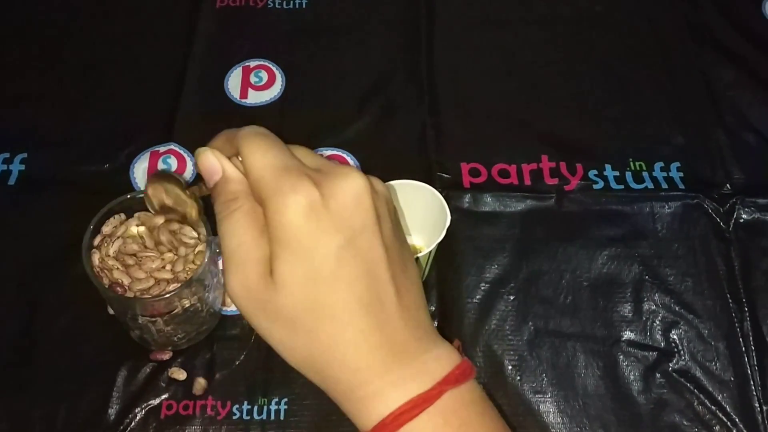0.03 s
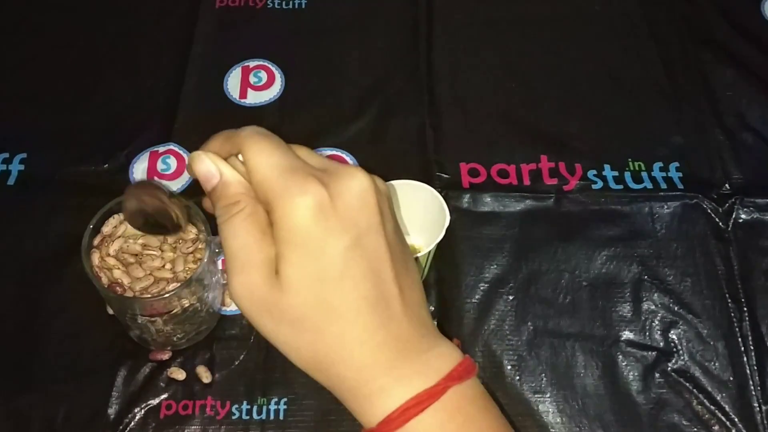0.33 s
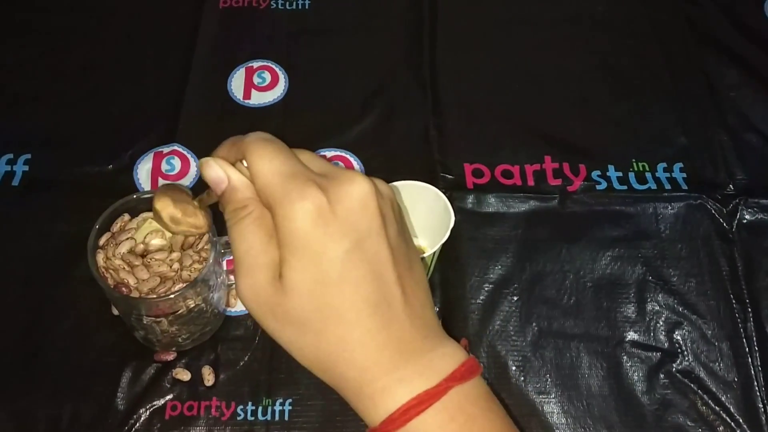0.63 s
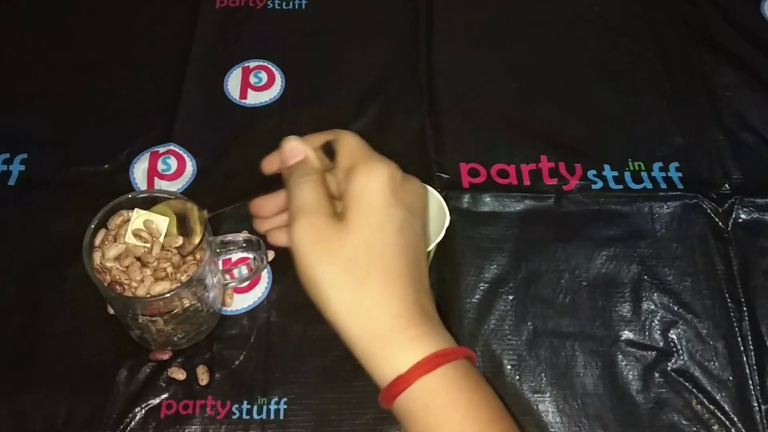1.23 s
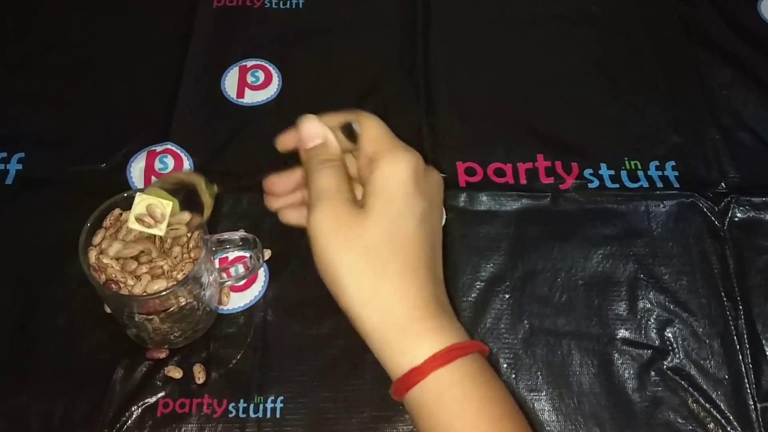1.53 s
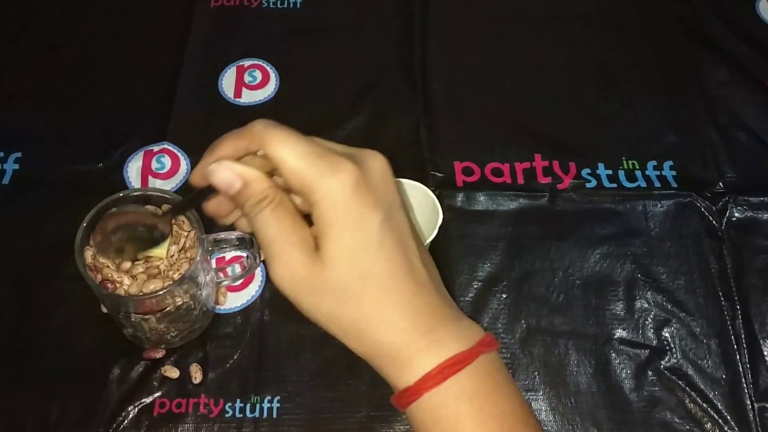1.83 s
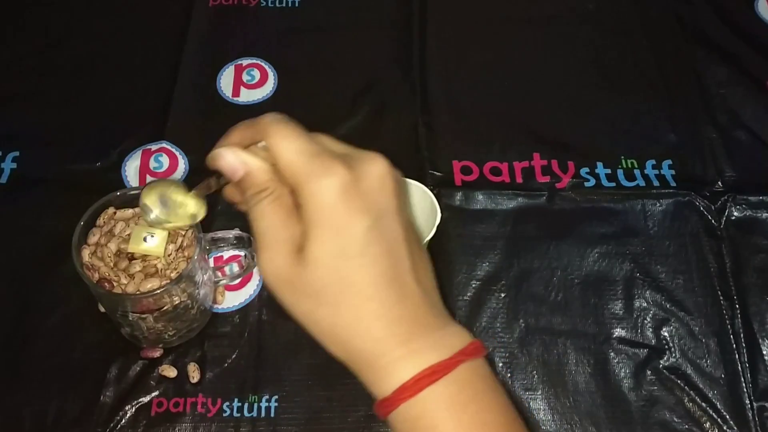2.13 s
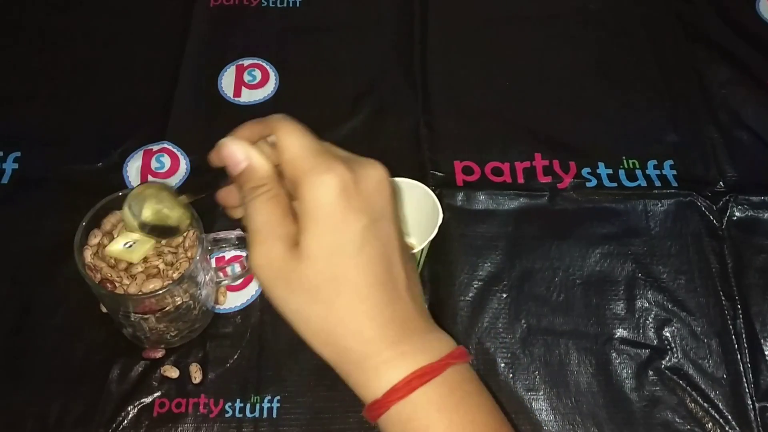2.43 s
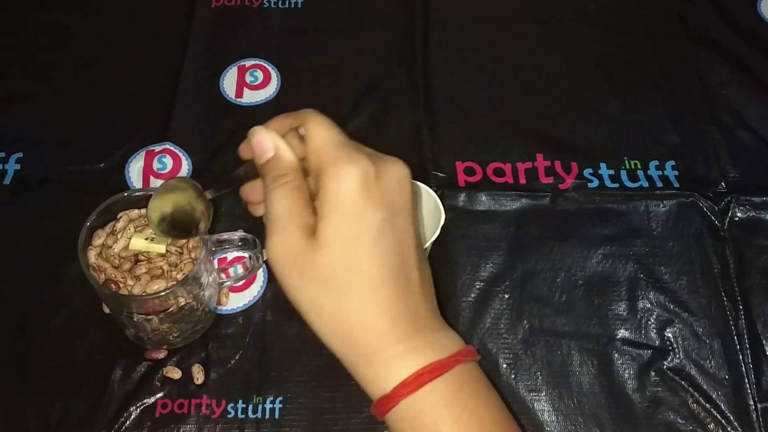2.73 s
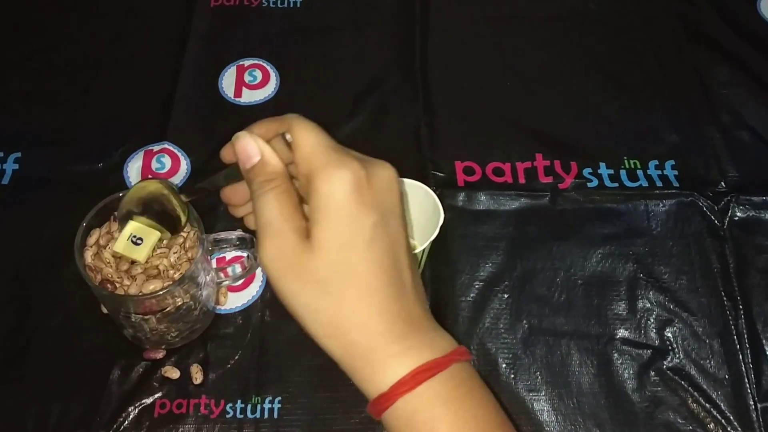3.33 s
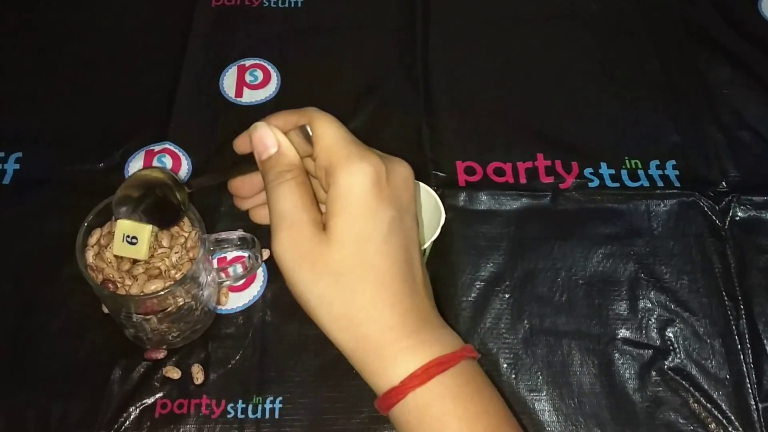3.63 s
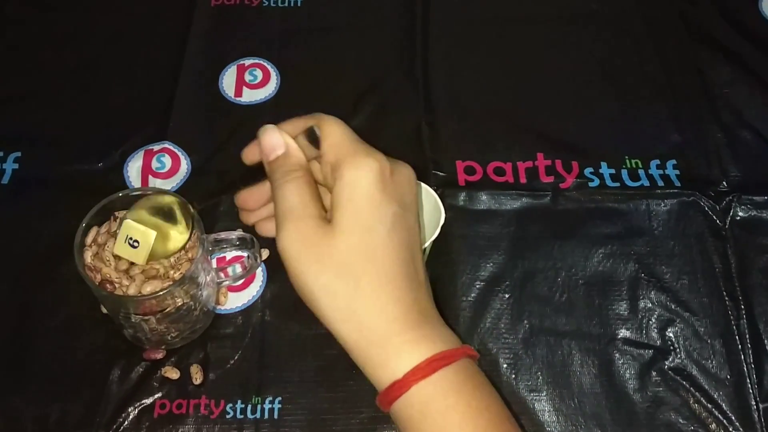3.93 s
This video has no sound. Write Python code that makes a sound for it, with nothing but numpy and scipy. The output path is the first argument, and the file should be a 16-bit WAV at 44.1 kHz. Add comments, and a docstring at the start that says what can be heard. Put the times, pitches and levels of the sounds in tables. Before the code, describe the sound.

A metal spoon digs through dry beans in a glass, close by in a small room. The beans rustle and tick, dull table knocks come early, then short clinks follow in clusters over a steady motor hum.

```python
"""A metal spoon digs in a glass of dry beans, close by, in a small hard-walled room.
From the outset a motor hums over dark noise, and the beans rustle and tick as the spoon scrapes through.
In the first half second hand and glass knock dully on the table, and the spoon first clinks on the glass,
its ring quickly damped by beans and fingers. The clinks then come in clusters, loudest near 1.8 and 2.5 s;
from 1.5 s the spoon's bowl also clacks hollowly on the beans, and one last knock falls at 2.9 s."""
import sys
import numpy as np
from scipy import signal
from scipy.fft import rfft, irfft
from scipy.io import wavfile
from scipy.ndimage import uniform_filter1d, minimum_filter1d

SR = 44100
rng = np.random.default_rng(int(sys.argv[2]) if len(sys.argv) > 2 else 0)


def unload_wav(signal):
    """Save mono or channel-first audio to the path in sys.argv[1] as 16-bit WAV at rate SR, clipped to [-1, 1]."""
    wavfile.write(
        sys.argv[1],
        SR,
        np.round(np.clip(np.atleast_2d(signal).T, -1, 1) * 32767).astype(np.int16),
    )


N = 176400
T = np.arange(N) / SR

# Faint tones beside the motor's main one: (frequency [Hz], level [dB])
MOTOR_PARTIALS = [(357, -66.5), (1077, -68)]
# Spectrum of the background noise: (frequency [Hz], relative density [dB])
NOISE_SPECTRUM = [(25, -105), (90, -101), (150, -81.5), (230, -80), (380, -80), (560, -85.5), (800, -88.5),
                  (1400, -96.5), (2300, -98.5), (3500, -102), (8000, -102), (15500, -102)]
# Likeness of that noise in left and right: (frequency [Hz], coherence [0-1])
NOISE_COHERENCE = [(60, 1), (180, 0.8), (550, 0.53), (1650, 0), (5000, 0)]
# Soft low swells in the noise: (time [s], frequency [Hz], level [dB])
NOISE_SWELLS = [(.37, 440, -51), (.7, 370, -54.5), (1.48, 523, -57.5), (1.53, 427, -52.5), (2.03, 390, -51),
                (3.28, 364, -50)]
# Push of the spoon, as the envelope of the rustle: (time [s], level [dB])
PUSH_ENVELOPE = [(0, -43), (.06, -40.5), (.15, -50.5), (.21, -45.5), (.36, -42), (.46, -61), (.58, -69),
                 (.6, -49), (.67, -62), (.72, -46), (.87, -59.5), (1.08, -46), (1.17, -52.5), (1.27, -39.5),
                 (1.31, -52.5), (1.6, -54.5), (1.75, -49.5), (1.9, -51.5), (1.99, -43), (2.06, -67),
                 (2.37, -78), (2.39, -47), (2.52, -57.5), (2.58, -41.5), (2.66, -56.5), (2.87, -63),
                 (2.95, -50), (3.14, -67), (3.29, -41.5), (3.35, -61), (3.54, -50), (3.6, -67),
                 (3.72, -49.5), (3.8, -68)]
# Single beans snapping past the spoon or dropping, and one faint dull touch of the spoon at 3.16 s: (time [s],
# body level [dB], click level [dB])
BEAN_TICKS = [(.0032,-56,-34.5),(0.0241,-47,-29.5),(0.2728,-43.5,-35),(0.353,-44,-32.5),(0.6421,-58,-41),(0.662,-52,-43),(0.701,-52,-33.5),(0.7122,-63,-29.5),(0.732,-51,-34.5),(0.7601,-51,-33),(.829,-52.5,-46),(0.8937,-44.5,-45),(0.9587,-50,-37.5),(0.979,-61,-44),(1.0102,-50,-38),(1.2084,-54,-38),(1.2324,-55,-34),(1.2627,-52,-29),(1.2713,-51,-36),(1.6259,-50,-42.5),(1.662,-50.5,-40),(1.716,-52,-30),(1.7237,-60,-38.5),(1.7742,-51,-39),(1.7948,-50,-38),(2.0037,-48,-34.5),(2.3939,-45,-32),(3.1581,-55,-41),(3.705,-55,-43.5)]
# Low resonances of beans on spoon and glass: (frequency [Hz], bandwidth [Hz], relative level [dB])
BEAN_BODY_MODES = [(1200, 1540, -3.5), (2340, 370, 2.5), (3340, 1300, 2), (4300, 2200, -2)]
# High resonances of the same contacts: (frequency [Hz], bandwidth [Hz], relative level [dB])
BEAN_CLICK_MODES = [(4610, 1200, -1), (5750, 190, -5.5), (7450, 880, -5.5), (8260, 490, 7.5),
                    (10300, 1300, 4), (10740, 430, 6), (12420, 250, 5.5), (13200, 1500, -5)]
# Sliding strokes of the spoon: (centre time [s], level [dB])
SCRAPE_STROKES = [(.04, -47.5), (.29, -54), (1.25, -53.5)]
# Resonances excited by sliding: (frequency [Hz], bandwidth [Hz], relative level [dB])
SCRAPE_MODES = [(2930, 950, -6.5), (4770, 420, 1), (6370, 810, 0.5)]
# Knocks of hand and glass on the table: (time [s], level [dB])
TABLE_KNOCKS = [(0.0527, -27.5), (.166, -38.5), (0.2323, -41.5), (.414, -45), (.4763, -44), (2.898, -41.5)]
# Resonances of a knock: (frequency [Hz], bandwidth [Hz], relative level [dB])
KNOCK_MODES = [(294, 350, -6), (690, 820, -4.5), (1144, 320, -7.5), (2500, 200, -13)]
# Spoon on glass: (time [s], main frequency [Hz], level of each of five mode groups, low to high [dB])
SPOON_CLINKS = [(0.184, 7990, -37, -26, -36.0, -33.5, -34), (0.739, 8690, -44, -25.5, -30.5, -37.0, -53.0),
                (0.7866, 8000, -42.5, -33, -55, -51.5, -64.5), (0.92, 8100, -48, -42, -33.5, -57, -56.5),
                (1.001, 8220.0, -41, -33.5, -40.5, -52.5, -55.5),
                (1.0608, 8280.0, -48, -22, -38, -34.0, -41), (1.0644, 8330, -41.5, -28, -31, -45.0, -71.5),
                (1.08, 8280, -47, -28, -28.5, -36, -53.5), (1.0851, 8000, -53, -30, -44, -43, -44.0),
                (1.3476, 8060, -43.5, -28, -42, -44, -43), (1.381, 7920, -34.5, -18, -41, -27.5, -20.5),
                (1.3966, 7820, -43, -22.5, -35, -27, -42), (1.4893, 8160, -35.5, -35.5, -44, -51, -70.0),
                (1.8026, 8040, -41.5, -35, -26, -27.5, -27), (1.8205, 8000.0, -28, -12.5, -31, -13.5, -23),
                (1.8329, 8040, -39, -21, -30, -26, -29), (1.8497, 8060, -45.0, -21.5, -43.0, -33.0, -38.0),
                (1.9257, 8100, -37, -25, -30, -22, -32.5), (1.942, 7830, -42, -26, -33, -31.0, -42.5),
                (1.9703, 7980.0, -33, -37, -38, -35, -40.5), (1.975, 7990, -32.5, -15, -30.0, -25, -31),
                (2.3803, 7890, -37, -34.5, -51, -41.5, -59.5),
                (2.5413, 8000, -36, -24, -20.5, -11.5, -39.0),
                (2.5519, 7980, -30.5, -18.5, -32, -17, -38.0), (2.6906, 7700, -47.5, -47, -37, -50, -54),
                (2.7582, 8040, -50, -47, -46, -40, -50), (2.817, 7930, -49, -31.5, -61, -38, -41),
                (2.898, 8200, -40, -48, -32, -34, -28.0), (2.9026, 8470.0, -36, -45, -26.5, -46.5, -39.5),
                (2.9629, 7940, -38.0, -32.5, -48, -45, -59.5),
                (3.2675, 8160.0, -35.5, -27.5, -21.5, -26, -33), (3.276, 8050, -36.5, -39.0, -39, -42, -33),
                (3.3534, 7900, -42.5, -30.0, -43, -26.5, -38.5), (3.3658, 7810, -44, -23, -48, -36, -36.5),
                (3.5073, 8650, -48, -45, -30, -49, -57), (3.5294, 8000.0, -49, -35.5, -54, -47, -64.0),
                (3.6311, 8030, -49, -32.5, -52, -51, -61.5)]
# Modes of spoon and glass, in five groups: (frequency [Hz], relative level [dB], 60 dB decay time [s])
CLINK_MODE_GROUPS = [
    [(4730, 12, 0.008), (5920, 11, 0.017), (7080, 18, 0.0042)],
    [(8140, -4.5, 0.018), (8000, -4, 0.017)],
    [(9860, 10, 0.014), (10310, 15.5, 0.015), (11750, 4.5, 0.01)],
    [(12170, 2, 0.014), (12530, 1.5, 0.003)],
    [(15540, 0, 0.029)],
]
# Shift of the modes by grip and beans from clink to clink, per group: (frequency spread [fraction])
GROUP_PITCH_SPREAD = [0.044, 0.00052, 0.031, 0, 0.0012]
# Fixed stereo balance, per group: (left minus right [dB])
GROUP_BALANCE_DB = [18.5, -17, -14, -1.5, 7]
# Feed to the room, per group: (gain [dB])
GROUP_FEED_DB = [-2, -8, -8.5, -8, -6.5]
# Clacks of the spoon's bowl: (time [s], level [dB])
BOWL_CLACKS = [(1.4893, -31.5), (2.3809, -35), (2.896, -28.5), (2.9015, -33), (3.2291, -35)]
# Resonances of a clack: (frequency [Hz], bandwidth [Hz], relative level [dB])
CLACK_MODES = [(2200, 330, -1), (2590, 410, -1), (5400, 1700, -5)]
# Reverberation of the room: (frequency [Hz], 60 dB decay time [s])
ROOM_DECAY = [(300, 0.26), (2500, 0.22), (8000, 0.29), (15000, 0.19)]

CONTACT_S, CONTACT_RISE_S, RING_S = 0.0006, 0.00016, 0.06
CLICK_PAN_DB, BODY_PAN_DB = -9, -6.5   # left minus right
HUM_LAG_S, BEAN_LAG_S, SPOON_LAG_S = 0.00028, 0.00013, 0.00015   # left behind right
BEAN_ROOM_DB = -4.5
MAIN_GROUP = 1   # the mode group tuned to each clink's main frequency


def from_db(db):
    """Amplitude ratio: tenfold for every 20 dB."""
    return 10 ** (np.asarray(db) / 20)


def unit_rms(x):
    """Normalisation to unit mean power."""
    return x / np.sqrt(np.mean(x ** 2) + 1e-30)


def at_hz(table, hz):
    """Interpolation on a logarithmic frequency axis."""
    freqs, values = np.transpose(table)
    return np.interp(np.log(np.maximum(hz, 1)), np.log(freqs), values)


def drift(rate_hz):
    """Random modulation of unit rms, linear between knots."""
    knots = rng.standard_normal(4000)
    return unit_rms(np.interp(T * rate_hz, np.arange(len(knots)), knots))


def band_limit(x, kind, hz, order=2):
    """Maximally flat filtering: low-, high- or band-pass."""
    return signal.sosfilt(signal.butter(order, hz, kind, fs=SR, output="sos"), x)


def resonate(x, hz, width_hz):
    """Damped resonance, passing about the same white-noise power at any bandwidth."""
    radius = np.exp(-np.pi * width_hz / SR)
    feedback = [1, -2 * radius * np.cos(2 * np.pi * hz / SR), radius ** 2]
    return signal.lfilter(np.sqrt(1 - radius ** 2) * np.array([1, 0, -1]), feedback, x + 1e-18)


def contact(decay_s):
    """Contact force of rough, hard surfaces: noise that builds up and decays exponentially."""
    t = np.arange(int(RING_S * SR)) / SR
    return rng.standard_normal(len(t)) * (1 - np.exp(-t / CONTACT_RISE_S)) * np.exp(-t / decay_s)


def impact(modes, decay_s=CONTACT_S, spread_db=4):
    """Modal superposition: one touch excites each resonance with a random strength."""
    return sum(from_db(db + spread_db * rng.standard_normal())
               * unit_rms(resonate(contact(decay_s), hz, width)) for hz, width, db in modes)


def add(track, time_s, db, sound):
    """Superposition of an event on a track, at the rms level given for its first 5 ms."""
    start = max(int(time_s * SR), 0)
    onset_rms = np.sqrt(np.mean(sound[:int(0.005 * SR)] ** 2))
    track[start:start + len(sound)] += (from_db(db) / onset_rms * sound)[:N - start]


def place(x, pan_db, lag_s):
    """Localisation by level and arrival time: the left channel receives the direct sound later."""
    delay = np.exp(-2j * np.pi * np.fft.rfftfreq(2 * N, 1 / SR) * lag_s)
    left = irfft(rfft(x, 2 * N) * delay)[:N]
    return np.array([left, x]) * unit_rms(from_db([[pan_db / 2], [-pan_db / 2]]))


def motor_hum(main_hz=195.5, main_db=-35.5):
    """Periodic vibration: a motor's tones, wavering slightly in level and phase."""
    main = from_db(main_db + 0.45 * drift(19)) * np.sin(2 * np.pi * main_hz * T + 0.035 * drift(14))
    faint = sum(from_db(db + 2.7 * drift(4.83)) * np.sin(2 * np.pi * hz * T + 0.19 * drift(8.2))
                for hz, db in MOTOR_PARTIALS)
    return np.sqrt(2) * place(main + faint, pan_db=0.29, lag_s=HUM_LAG_S)


def background(floor_db=-52, swell_s=0.093, width_hz=64.8):
    """Partial coherence: dark room noise, alike on both sides in the bass, with narrow-band swells."""
    freqs = np.fft.rfftfreq(N, 1 / SR)
    mid, side = rfft(rng.standard_normal((2, N))) * from_db(at_hz(NOISE_SPECTRUM, freqs))
    coherence = np.clip(at_hz(NOISE_COHERENCE, freqs), -1, 1)
    spectra = np.sqrt(1 + coherence) * mid + np.sqrt(1 - coherence) * side * [[1], [-1]]
    noise = from_db(floor_db) * unit_rms(irfft(spectra, N))
    for time_s, hz, db in NOISE_SWELLS:
        band = resonate(resonate(rng.standard_normal(N), hz, width_hz), hz, width_hz)
        noise += from_db(db) * np.exp(-0.5 * ((T - time_s) / swell_s) ** 2) * unit_rms(band)
    return noise


def rustle(modes, grains_per_s=1000, spread_db=4):
    """Shot noise: many tiny bean collisions of uneven size, each exciting one resonance."""
    sizes = from_db(spread_db * np.minimum(rng.exponential(1, N), 5)) * rng.choice([-1, 1], N)
    impulses = sizes * (rng.random(N) < grains_per_s / SR)
    struck_mode = rng.integers(0, len(modes), N)
    return unit_rms(sum(from_db(db) * resonate(impulses * (struck_mode == k), hz, width)
                        for k, (hz, width, db) in enumerate(modes)))


def beans(flutter_db=4):
    """Granular flow: the rustle grows with the spoon's push, and single beans tick above it."""
    push_db = np.interp(T, *np.transpose(PUSH_ENVELOPE)) + flutter_db * drift(70)
    click = rustle(BEAN_CLICK_MODES) * from_db(push_db - 3)
    body = rustle(BEAN_BODY_MODES) * from_db(0.79 * push_db - 17)   # follows the push less
    for time_s, body_db, click_db in BEAN_TICKS:
        add(body, time_s, body_db, impact(BEAN_BODY_MODES, decay_s=0.0042))
        add(click, time_s, click_db, impact(BEAN_CLICK_MODES, decay_s=0.00048))
    click = band_limit(click, "high", hz=3650)
    direct = place(click, CLICK_PAN_DB, BEAN_LAG_S) + place(body, BODY_PAN_DB, BEAN_LAG_S)
    return direct, from_db(BEAN_ROOM_DB) * (click + body)


def scrapes(half_stroke_s=0.077):
    """Sliding friction: the spoon's bowl draws a fine, even rasp from beans and glass."""
    envelope = sum(from_db(db) * np.sqrt(np.maximum(1 - ((T - time_s) / half_stroke_s) ** 2, 0))
                   for time_s, db in SCRAPE_STROKES)
    rasp = envelope * band_limit(rustle(SCRAPE_MODES), "high", hz=SCRAPE_MODES[0][0] / 2)
    return place(rasp, 0, BEAN_LAG_S), from_db(BEAN_ROOM_DB) * rasp


def knocks(room_db=-4):
    """Impulse response of heavily damped modes: hand and glass thud on the table."""
    tap = signal.unit_impulse(int(RING_S * SR))
    thud = sum(from_db(db) * (-1) ** k * resonate(tap, hz, width)
               for k, (hz, width, db) in enumerate(KNOCK_MODES))
    thud = band_limit(band_limit(thud, "high", hz=188), "low", hz=3200)
    track = np.zeros(N)
    for time_s, db in TABLE_KNOCKS:
        add(track, time_s, db, thud)
    return place(track, BODY_PAN_DB / 2, BEAN_LAG_S), from_db(room_db) * track


def clink_ring(modes, shift, pitch_spread, chatter_s=0.003, chatter_db=-11):
    """Damped free vibration: a touch and a quick, weaker second one set a group of modes ringing."""
    gap = int(chatter_s * SR * rng.uniform(0.46, 1))
    ring = 0
    for hz, db, t60 in modes:
        force = contact(CONTACT_S) + from_db(chatter_db) * np.roll(contact(CONTACT_S), gap)
        pitch, strength = rng.standard_normal(2)
        width_hz = np.log(1000) / (np.pi * t60)
        mode = resonate(force, hz * shift * (1 + pitch_spread * pitch), width_hz)
        ring = ring + from_db(db + 2 * strength) * unit_rms(mode)
    edges_hz = [shift * modes[0][0] / 1.12, shift * modes[-1][0] * 1.12]   # trims the resonance skirts
    return band_limit(ring, "band", edges_hz, order=1)


def clinks(jolt_db=-9.5):
    """Modal excitation: each clink of spoon on glass has its own main pitch and jolts the beans."""
    direct, feed = 0, 0
    for k, modes in enumerate(CLINK_MODE_GROUPS):
        group = np.zeros(N)
        for time_s, main_hz, *levels_db in SPOON_CLINKS:
            shift = main_hz / modes[-1][0] if k == MAIN_GROUP else 1
            add(group, time_s, levels_db[k], clink_ring(modes, shift, GROUP_PITCH_SPREAD[k]))
        direct += place(group, GROUP_BALANCE_DB[k], SPOON_LAG_S)
        feed += from_db(GROUP_FEED_DB[k]) * group
    jolts = np.zeros(N)
    for time_s, _, *levels_db in SPOON_CLINKS:
        add(jolts, time_s, levels_db[0] + jolt_db, impact(BEAN_BODY_MODES))
    return direct + place(jolts, BODY_PAN_DB, BEAN_LAG_S), feed + from_db(BEAN_ROOM_DB) * jolts


def clacks(room_db=-6.5):
    """Impact on broad resonances: the spoon's bowl clacks hollowly against the beans."""
    track = np.zeros(N)
    for time_s, db in BOWL_CLACKS:
        add(track, time_s, db, impact(CLACK_MODES))
    return place(track, BODY_PAN_DB, BEAN_LAG_S), from_db(room_db) * track


def room(feed, build_s=0.0017):
    """Diffuse reverberation: dense reflections, unrelated left and right, decay at each band's own rate."""
    t = np.arange(SR // 2) / SR
    edges_hz = np.geomspace(150, 18000, 9)
    tail = 0
    for low, high in zip(edges_hz, edges_hz[1:]):
        band = band_limit(rng.standard_normal((2, len(t))), "band", [low, high])
        t60 = at_hz(ROOM_DECAY, np.sqrt(low * high))
        tail += band * np.exp(-np.log(1000) * t / t60)
    tail = unit_rms(tail * (1 - np.exp(-(t / build_s) ** 2))) / np.sqrt(len(t))
    return signal.fftconvolve(feed[None], tail, axes=1)[:, :N]


def scene():
    """Superposition: each contact source gives direct sound and a room feed, over hum and noise."""
    direct, feed = zip(beans(), scrapes(), knocks(), clinks(), clacks())
    return motor_hum() + background() + sum(direct) + room(sum(feed))


def record(dry, limit_db=-4, release_db_per_s=96, cutoff_hz=16200):
    """Peak limiting: the gain dips briefly at peaks over the limit; the top treble is then cut steeply."""
    peak_db = 20 * np.log10(np.abs(dry).max(axis=0) + 1e-9)
    over_db = np.maximum(peak_db - limit_db, 0)
    held_db = np.maximum.accumulate(over_db + release_db_per_s * T) - release_db_per_s * T
    gain = from_db(uniform_filter1d(minimum_filter1d(-held_db, size=256), size=256))
    return signal.sosfilt(signal.ellip(10, 0.1, 80, cutoff_hz, fs=SR, output="sos"), dry * gain)


dry = scene()
out = record(dry)
unload_wav(out)
```